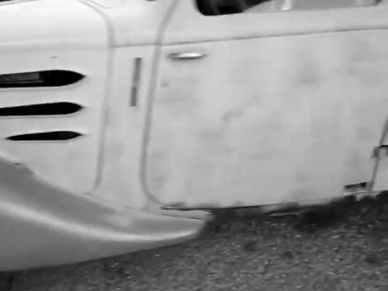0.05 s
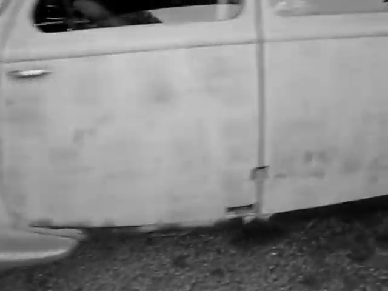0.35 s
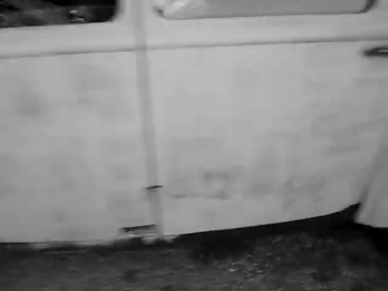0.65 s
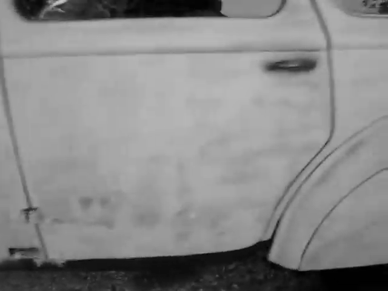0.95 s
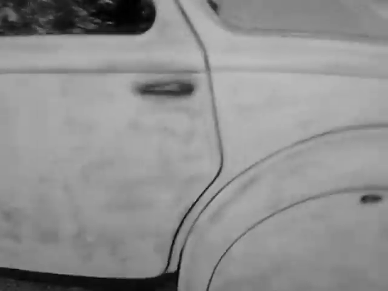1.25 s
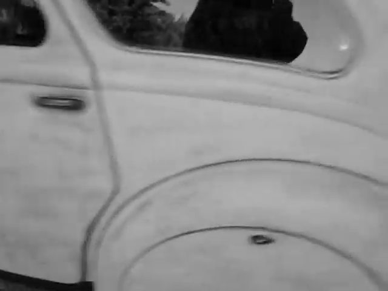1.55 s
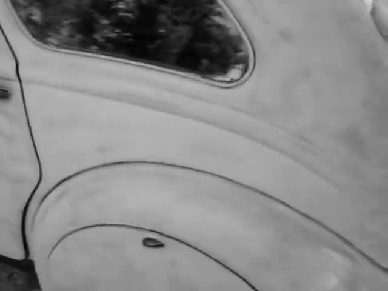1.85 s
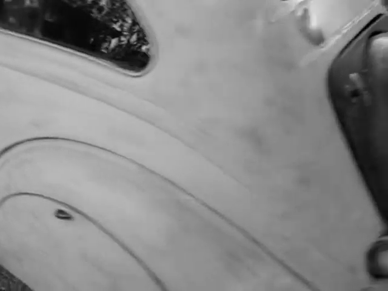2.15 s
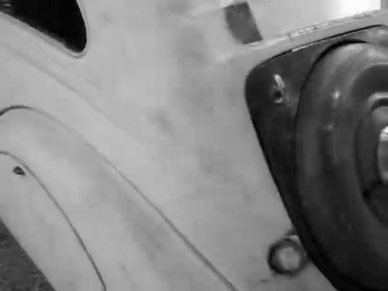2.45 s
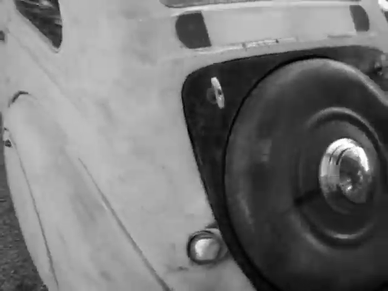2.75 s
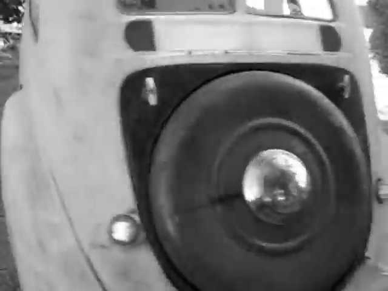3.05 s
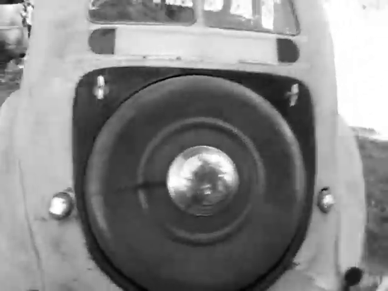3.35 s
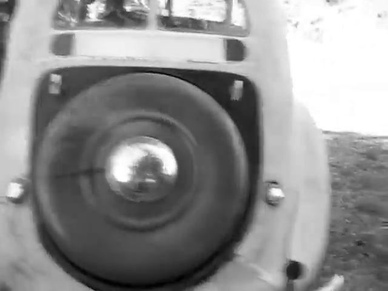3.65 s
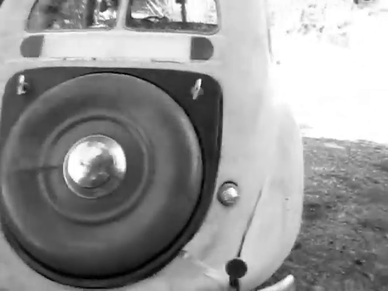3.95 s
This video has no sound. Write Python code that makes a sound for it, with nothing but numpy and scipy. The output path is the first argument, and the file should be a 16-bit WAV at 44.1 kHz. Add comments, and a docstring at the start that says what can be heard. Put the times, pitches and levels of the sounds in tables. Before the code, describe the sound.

An old car idling with a chugging exhaust that slows and sputters toward the end.

```python
"""An old car idling

The engine beats unevenly and slows while the listener walks from the bonnet round to the tail.
Each firing drives the exhaust hum, a chuff of gas and a hissing spit, and rings the pipe's modes;
now and then the exhaust sputters. The engine bay's whirr fades as rasps and tinny pings come near."""
import sys
import numpy as np
from scipy.fft import rfft, irfft, next_fast_len
from scipy.io import wavfile
from scipy.ndimage import map_coordinates

SR = 44100
rng = np.random.default_rng(int(sys.argv[2]) if len(sys.argv) > 2 else 0)


def master_out(mix):
    """Clip the mix to full scale and print it as 16-bit PCM to the path in sys.argv[1]."""
    frames = np.transpose(np.atleast_2d(mix))
    ceiling = np.clip(frames, -1, 1)
    pcm = np.round(ceiling * 32767).astype(np.int16)
    wavfile.write(sys.argv[1], SR, pcm)


N = 176400

# Smearing of the pulses by the body: t/s, lead of the even orders/cycles
SMEARING = [(2, .23), (2.4, .1)]
# Relative levels along the walk: t/s, chuff/dB, engine bay/dB, spit/dB
WALK_LEVELS = [(0, -29, -28, -38.5), (.6, -29.5, -29.5, -47.5), (1.1, -29, -31.5, -39),
               (1.5, -30, -33, -35.5), (2.2, -27.5, -36, -35), (2.9, -28, -35.5, -33.5),
               (3.33, -28, -36, -32.5), (3.5, -33, -38.5, -38.5), (3.78, -35, -35, -37.5),
               (4, -36, -35, -36.5)]
# Ringing levels: t/s, tailpipe/dB, hollow under the body/dB
RING_LEVELS = [(2.1, -48, -39), (3.05, -42, -29.5), (3.35, -33, -36.5), (3.65, -35.5, -40),
               (3.76, -27.5, -35), (4, -34, -43)]
# Spectrum of spitting gas: f/Hz, relative level/dB
SPIT_SPECTRUM = [(600, 4.5), (1500, -9), (2600, 3.5), (3700, 6), (4400, 2), (6000, -5), (7100, -35)]

def amp(db):
    """Decibels to gain."""
    return 10 ** (np.asarray(db) / 20)

def unit(x):
    """x at rms 1."""
    return x / np.sqrt(np.mean(x ** 2) + 1e-20)

def curves(rows):
    """Each column after the time, interpolated to every sample."""
    times, *columns = np.transpose(rows)
    return [np.interp(np.arange(N) / SR, times, column) for column in columns]

def wobble(rate):
    """A smooth random curve, rate knots a second."""
    knots = rng.standard_normal(int(N * rate / SR) + 4)
    return map_coordinates(knots, [np.arange(N) * rate / SR])

def bumps(rows, width_s=0.018):
    """Gain with brief Gaussian rises or dips, from rows of t/s, change/dB."""
    t = np.arange(N) / SR
    return amp(sum(db * np.exp(-((t - s) / width_s) ** 2) for s, db in rows))

def filtered(x, response):
    """Linear filtering: the spectrum of x times a frequency response."""
    size = next_fast_len(len(x) + SR // 4)
    return irfft(rfft(x, size) * response(np.fft.rfftfreq(size, 1 / SR)), size)[:len(x)]

def coloured(x, spectrum):
    """x shaped by rows of f/Hz, level/dB, at rms 1."""
    hz, db = np.transpose(spectrum)
    return unit(filtered(x, lambda f: amp(np.interp(np.log(f + 1), np.log(hz + 1), db))))

def resonated(x, modes):
    """x through parallel second-order resonators, at rms 1."""
    def response(f):
        return sum(amp(db) * 1j * f * width / (hz * hz - f * f + 1j * f * width)
                   for hz, width, db in modes)
    return unit(filtered(x, response))

def firings(pulse_phase=0.718):
    """Phase integrates frequency: the running count of firings, and their rate."""
    # Engine speed: t/s, firing rate/Hz
    speed = [(0.0, 43.1), (0.2, 41.35), (0.33, 43.07), (0.5, 44.62), (0.75, 44.03), (1.04, 43.11),
             (1.3, 45.4), (1.55, 47.09), (1.8, 46.94), (2.02, 46.42), (2.29, 40.93), (2.48, 39.3),
             (2.77, 40.12), (3.0, 39.52), (3.22, 36.82), (3.45, 33.23), (3.7, 28.95), (4.0, 25.28)]
    rate, = curves(speed)
    return np.cumsum(rate) / SR - pulse_phase + 2, rate

def strokes(lead):
    """Each sample's firing number and the seconds since that firing began, lead cycles early."""
    count, rate = firings()
    which, part = np.divmod(count + lead, 1)
    return which.astype(int), part / rate

def per_firing(which):
    """A fresh random value for each firing."""
    return rng.standard_normal(256)[which]

def puffs(lead, rise_s, decay_s, steady, scatter_db, grain_db):
    """Modulated noise: a burst at each firing adds in power to a steady flow."""
    which, age = strokes(lead)
    strength = amp(scatter_db * per_firing(which))
    burst = unit(strength * (1 - np.exp(-age / rise_s)) * np.exp(-age / decay_s))
    envelope = np.hypot(burst, steady) / np.hypot(1, steady)
    return envelope * amp(grain_db * wobble(450)) * rng.standard_normal(N)

def rung(modes, lead, rise_s, decay_s, detune, blur):
    """Damped modes struck anew by each firing, never twice alike in pitch or strength."""
    which, age = strokes(lead)
    part = (firings()[0] + lead) % 1
    fade = np.minimum(1, 10 * (1 - part))
    envelope = (1 - np.exp(-age / rise_s)) * np.exp(-age / decay_s) * fade
    ring = np.zeros(N)
    for hz, db in modes:
        pitch = hz * (1 + detune * per_firing(which))
        phase = 2 * np.pi * (pitch * age + per_firing(which))
        ring += amp(db + 3.2 * per_firing(which)) * np.sin(phase + blur * wobble(400))
    return unit(ring * envelope)

def swells(rows, width_s=0.04, half_band_hz=100):
    """Narrow-band noise under Gaussian envelopes."""
    t = np.arange(N) / SR
    def band(hz):
        noise = rng.standard_normal(N)
        return unit(filtered(noise, lambda f: 1 / (1 + ((f - hz) / half_band_hz) ** 2)))
    return sum(amp(db) * np.exp(-((t - s) / width_s) ** 2) * band(hz) for s, db, hz in rows)

def hum():
    """Periodic exhaust pulses form harmonics; the one nearest the pipe's lowest resonance booms."""
    # Harmonics of the firing rate: t/s, level/dB of orders 1 to 6
    orders = [(.2, -33, -56, -22, -35, -34.5, -32), (.55, -37, -44.5, -19, -30.5, -34, -37),
              (1.05, -34, -34.5, -18, -28.5, -42, -37.5), (1.5, -29.5, -28, -19, -31.5, -33, -43.5),
              (1.95, -27, -27.5, -21, -49.5, -28.5, -34.5), (2.3, -31.5, -33, -21, -55, -36.5, -37.5),
              (2.6, -30.5, -33.5, -22, -37, -49, -38), (3, -29, -34, -22, -34.5, -38, -36),
              (3.27, -34, -31, -24.5, -35.5, -48, -36.5), (3.42, -34, -32.5, -31, -20, -50, -37.5),
              (3.7, -39.5, -30, -46.5, -21.5, -37, -45), (3.87, -49, -25, -42, -26.5, -22, -62),
              (4, -48, -29, -25, -33, -23, -36)]
    misfires = [(3.258, -6), (3.897, -11)]  # weak firings: t/s, dip/dB
    count, rate = firings()
    unevenness = (rate.mean() / rate) ** 2  # a slower engine beats less evenly
    smear, = curves(SMEARING)
    pressure = np.zeros(N)
    for order, db in enumerate(curves(orders), 1):
        flutter_db = (0.58 if order == 3 else 1.5) * unevenness * wobble(28)
        cycles = order * count + smear * (order % 2 == 0)
        pressure -= np.sqrt(2) * amp(db + flutter_db) * np.sin(2 * np.pi * cycles)
    return pressure * bumps(misfires)

def rumble():
    """Unequal firings spread energy into the gaps between the harmonics."""
    # Rumble strength: t/s, level/dB
    levels = [(.7, -31), (.93, -31.5), (2.4, -29.5), (3.1, -33), (3.4, -27.5), (4, -31)]
    # Rumble spectrum: f/Hz, relative level/dB
    spectrum = [(20, -34), (38, -11.5), (125, -1), (230, -1), (500, -17.5), (1200, -61.5)]
    flow = puffs(lead=0.34, rise_s=0.006, decay_s=0.02, steady=1, scatter_db=0.5, grain_db=0)
    return amp(curves(levels)[0]) * coloured(flow, spectrum)

def engine_bay(whirr_db=-1.23, bonnet_db=-5.0):
    """Broadband noise of valve gear and fan pulses slightly and forces the bonnet's resonances."""
    # Whirr spectrum: f/Hz, relative level/dB
    spectrum = [(400, -20), (1400, -12), (2450, -3), (3300, -11.5), (5200, -16), (7300, -37.5)]
    # Bonnet modes: f/Hz, bandwidth/Hz, relative level/dB
    modes = [(814, 87, 0), (1686, 33, -3), (3563, 50, -8)]
    clatter = dict(lead=0.43, rise_s=0.002, decay_s=0.0046, steady=2.3, scatter_db=0, grain_db=1.1)
    whirr = amp(whirr_db) * coloured(puffs(**clatter), spectrum)
    bonnet = amp(bonnet_db) * resonated(puffs(**clatter), modes)
    return amp(curves(WALK_LEVELS)[1]) * (whirr + bonnet)

def chuff(gain_db=-1.37):
    """Each firing's rush of gas excites cavity resonances under the body."""
    # Gas spectrum: f/Hz, relative level/dB
    spectrum = [(200, -23), (340, -4), (470, -2), (1050, 1), (1620, -5), (1850, -9), (7000, -51)]
    # Cavity modes: f/Hz, bandwidth/Hz, relative level/dB
    modes = [(633, 23, -1.5), (765, 50, 0), (1000, 80, 1)]
    gas = puffs(lead=0.39, rise_s=0.002, decay_s=0.022, steady=1, scatter_db=1.4, grain_db=1.5)
    thrust = puffs(lead=0.33, rise_s=0.0042, decay_s=0.0076, steady=0.63, scatter_db=5, grain_db=0.5)
    direct = amp(curves(WALK_LEVELS)[0] + gain_db) * coloured(gas, spectrum)
    return direct + amp(curves(RING_LEVELS)[1]) * resonated(thrust, modes)

def spit(gain_db=-1.2, diffusion=52):
    """Pulsed flow noise: smeared to a wash along the car's side, sharp near the pipe."""
    wash = diffusion * curves(SMEARING)[0] ** 2
    gas = puffs(lead=0.17, rise_s=0.0018, decay_s=0.008, steady=wash, scatter_db=1.2, grain_db=1.2)
    return amp(curves(WALK_LEVELS)[2] + gain_db) * coloured(gas, SPIT_SPECTRUM)

def squeaks():
    """Shaken metal beside the rear door vibrates faintly in narrow bands."""
    # Squeaks: t/s, level at the crest/dB, f/Hz
    events = [(1.22, -38, 3720), (1.275, -41.5, 4400), (1.745, -41, 4150)]
    return swells(events)

def sputters(gain_db=-5.5, rise_s=0.00036, decay_s=0.015, width_hz=120, crack_s=0.0057):
    """Transients in the exhaust: a resonant pop with a shorter broadband crack."""
    # Sputters: t/s, relative level/dB, f/Hz, crack re pop/dB
    events = [(1.868, -14.5, 290, -24), (2.452, -15, 1150, -21), (3.001, -12, 1010, -17),
              (3.024, -13, 1010, -22), (3.241, -26, 695, -6), (3.365, -14, 1110, -15),
              (3.562, -12, 1000, -21), (3.619, -16.5, 970, -14), (3.741, -16, 650, -14),
              (3.848, -20.5, 616, -21), (3.96, -16.5, 590, -7)]
    pops, cracks = np.zeros((2, N + SR))
    t = np.arange(SR // 10) / SR
    envelope = (1 - np.exp(-t / rise_s)) * np.exp(-t / decay_s)
    for s, db, hz, crack_db in events:
        pop = resonated(rng.standard_normal(len(t)), [(hz, width_hz, 0)])
        crack = coloured(rng.standard_normal(len(t)), SPIT_SPECTRUM)
        pops[round(s * SR):][:len(t)] += amp(db) * envelope * pop
        cracks[round(s * SR):][:len(t)] += amp(db + crack_db) * np.exp(-t / crack_s) * crack
    dull_pops = filtered(pops[:N], lambda f: 1 / (1 + (f / 2600) ** 4))
    return amp(gain_db) * (dull_pops + cracks[:N])

def rasps():
    """Exhaust gas rasps in short swells of narrow-band flow noise."""
    # Rasps: t/s, level at the crest/dB, f/Hz
    events = [(2.42, -31.5, 1480), (2.72, -31.5, 1430), (2.91, -30.5, 1500), (3.135, -30, 1415),
              (3.335, -30, 1320)]
    return swells(events)

def pings():
    """Free vibration of the pipe's thin metal end: clear from beside it, raspier from behind."""
    # Ping strength: t/s, relative level beside/dB, behind/dB
    levels = [(2.2, -53, -54), (2.6, -42, -44.5), (3.12, -36, -53), (3.55, -52.5, -46), (3.8, -49, -38.5)]
    # Modes heard beside the pipe: f/Hz, relative level/dB
    side_modes = [(3590, -5.5), (3930, -7), (4970, 2)]
    # Modes heard behind it: f/Hz, relative level/dB
    rear_modes = [(4050, -6.5), (4680, 4.5), (5050, -2.5)]
    beside, behind = amp(curves(levels))
    strike = dict(lead=0.15, rise_s=0.0022, decay_s=0.007)
    clear = rung(side_modes, **strike, detune=0.006, blur=0.6)
    raspy = rung(rear_modes, **strike, detune=0.025, blur=1)
    return beside * clear + behind * raspy

def tailpipe():
    """Impulse excitation: each firing rings the pipe's normal modes."""
    # Pipe modes: f/Hz, relative level/dB
    modes = [(382, -5.5), (530, -0.5), (644, 2.5), (778, -6.5), (1430, -4.5)]
    ring = rung(modes, lead=0.131, rise_s=0.0047, decay_s=0.03, detune=0.0074, blur=0.29)
    return amp(curves(RING_LEVELS)[0]) * ring

def scene():
    """Superposition of the car's sources, in mono."""
    # Hard firings, which spit and ping louder: t/s, boost/dB
    hard_firings = [(3.06, 2.5), (3.305, 4.5), (3.776, 5), (3.962, 1.5)]
    ticking = bumps(hard_firings) * (pings() + spit())
    idle = hum() + rumble() + engine_bay() + chuff()
    return (idle + rasps() + squeaks() + tailpipe() + ticking + sputters())[None]

def record(dry, top_hz=7500, taper_hz=450):
    """Band limiting: the treble tapers to nothing at top_hz."""
    return filtered(dry[0], lambda f: np.clip((top_hz - f) / taper_hz, 0, 1) ** 2)[None]

dry = scene()
out = record(dry)
master_out(out)
```